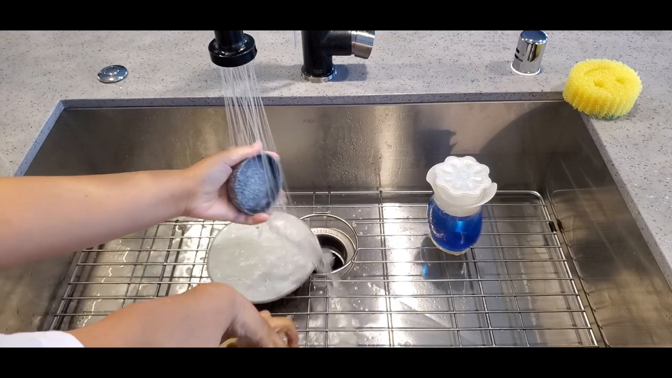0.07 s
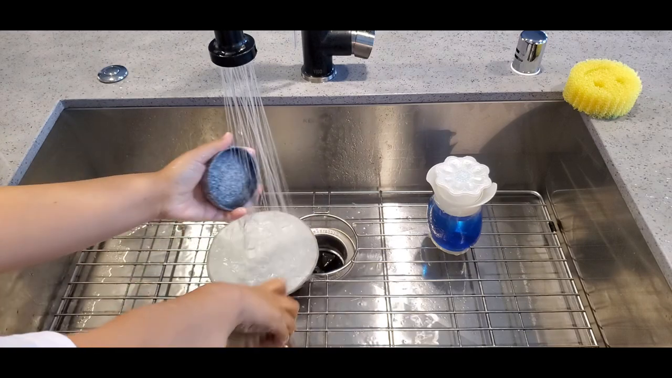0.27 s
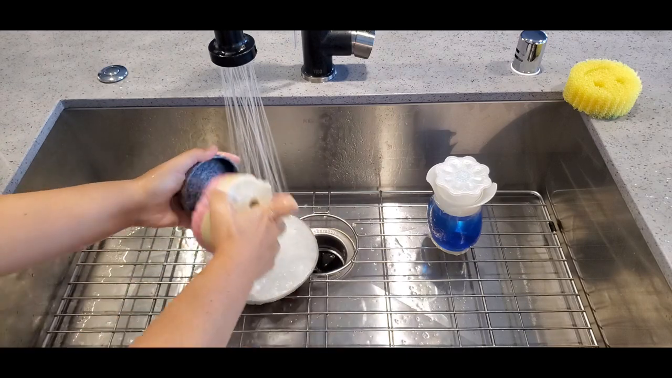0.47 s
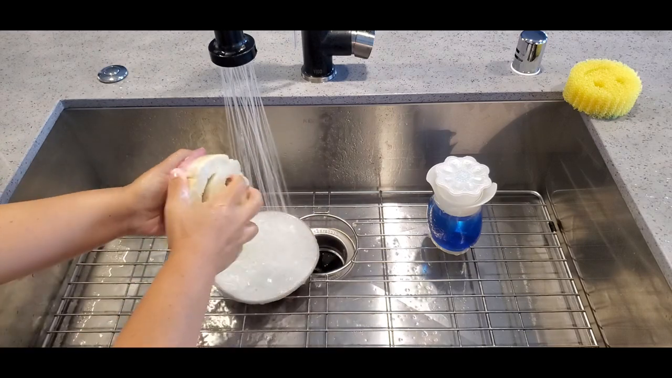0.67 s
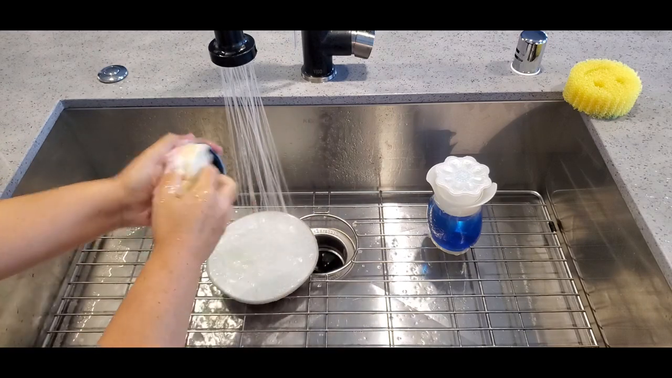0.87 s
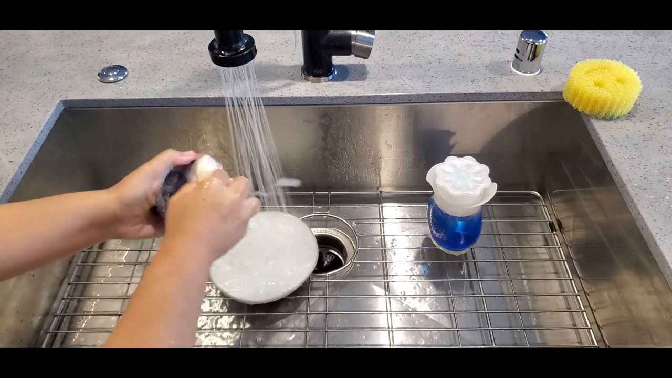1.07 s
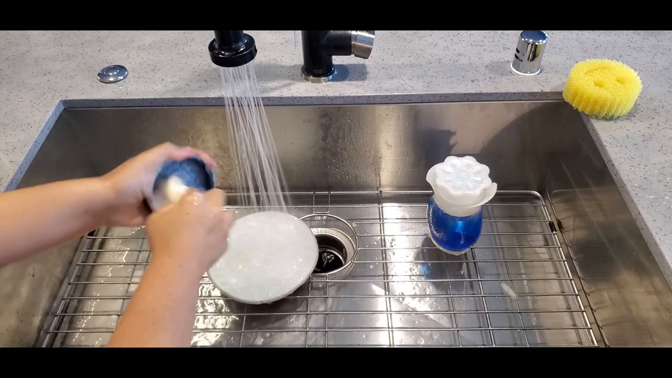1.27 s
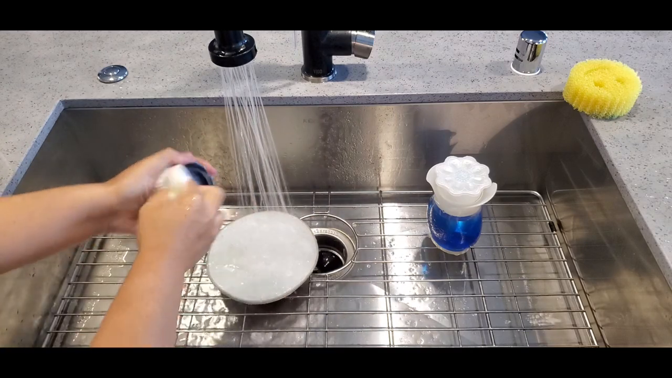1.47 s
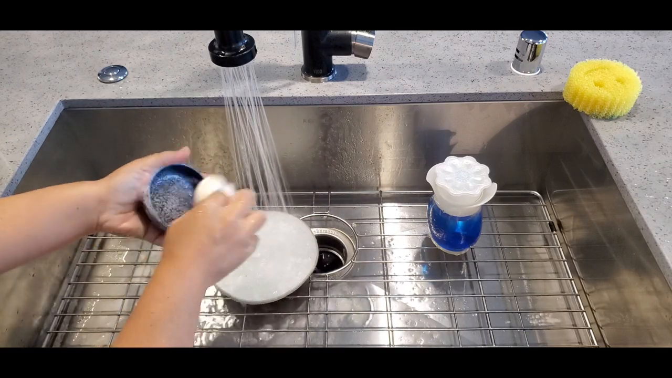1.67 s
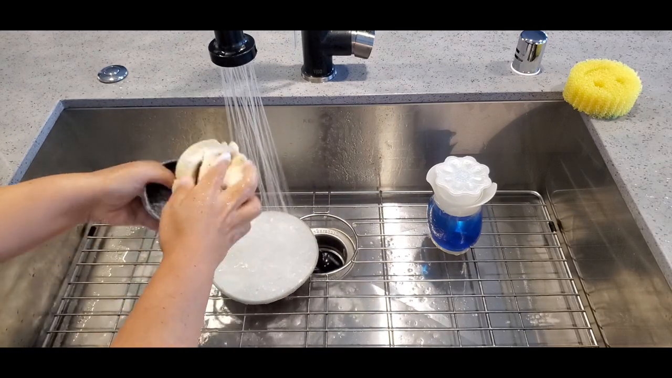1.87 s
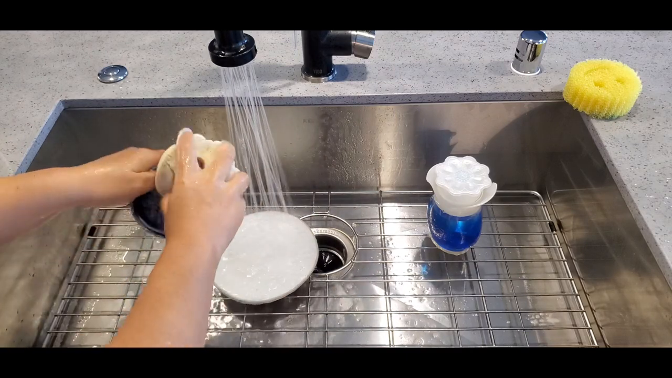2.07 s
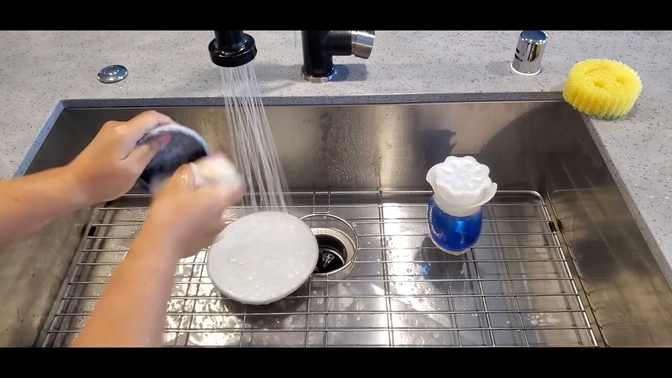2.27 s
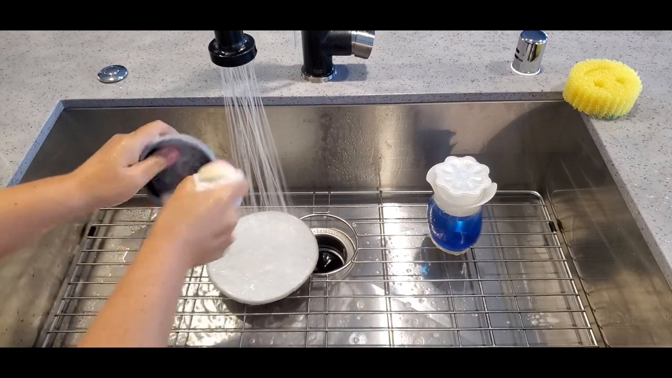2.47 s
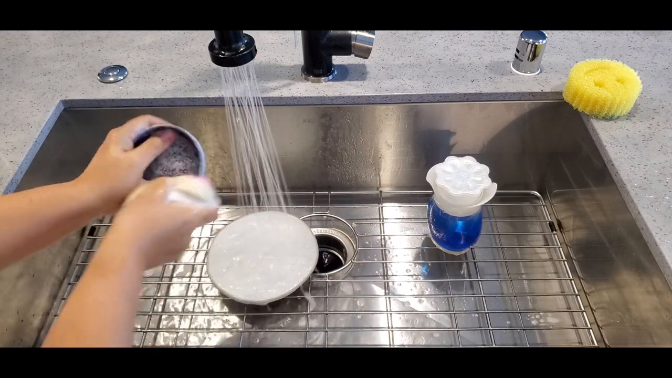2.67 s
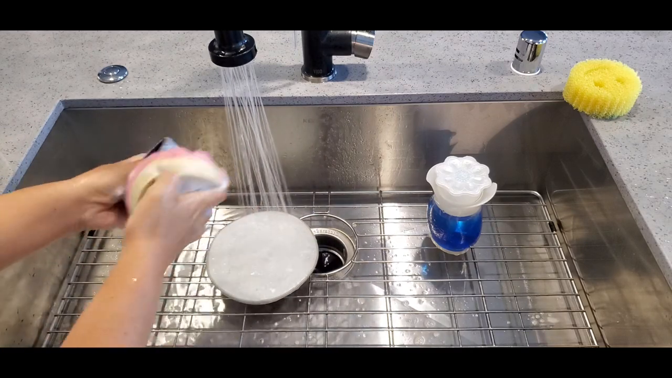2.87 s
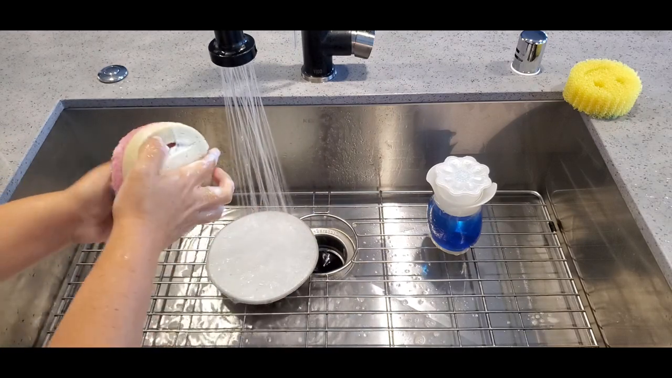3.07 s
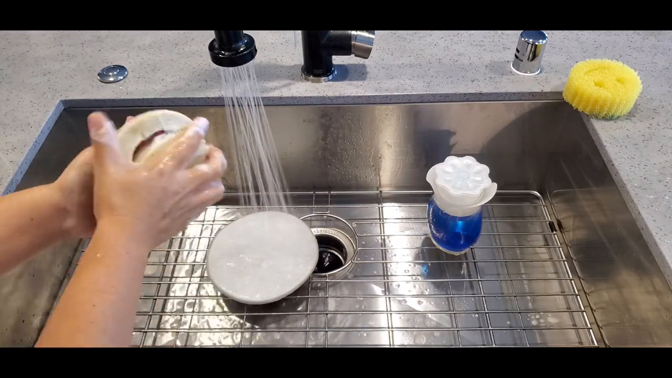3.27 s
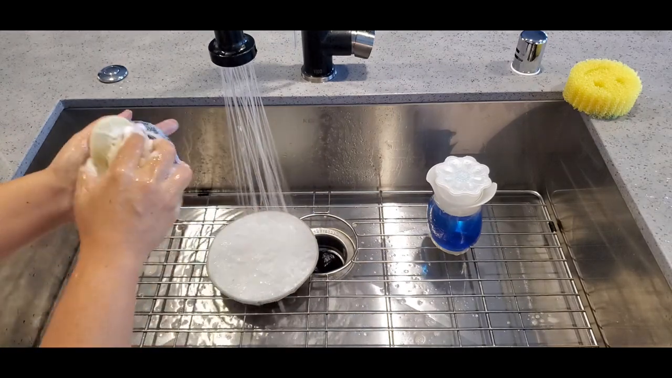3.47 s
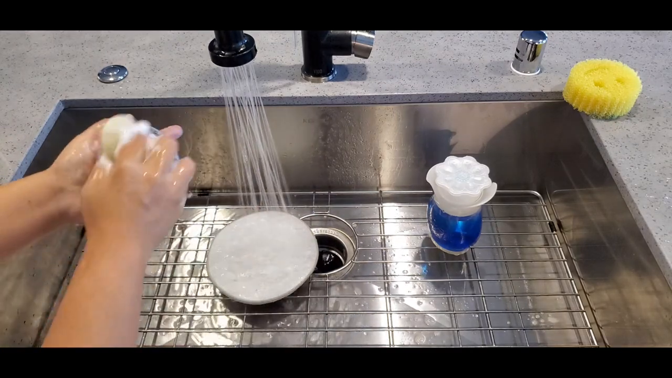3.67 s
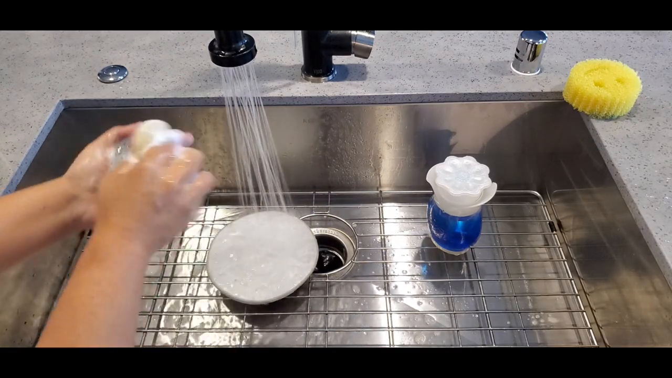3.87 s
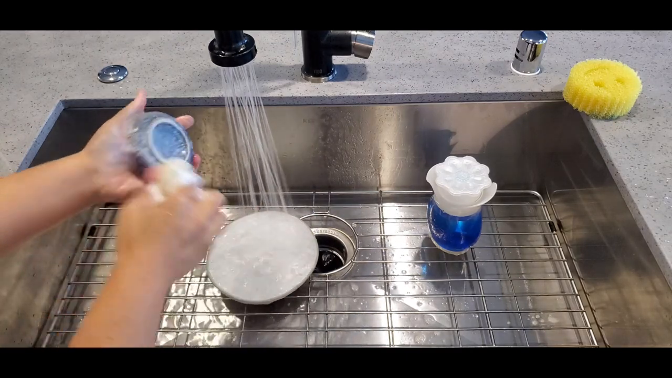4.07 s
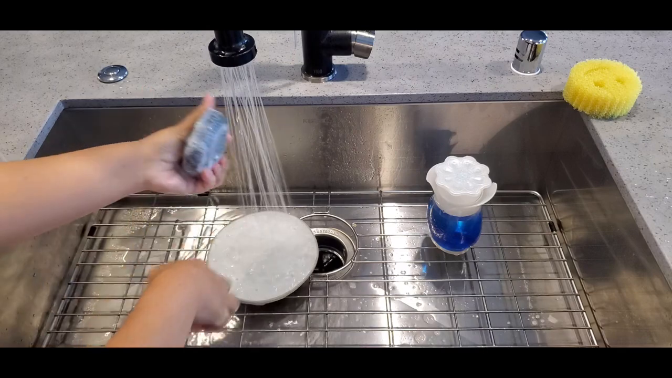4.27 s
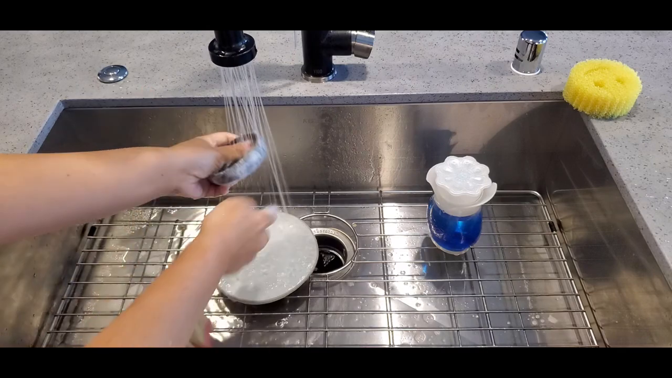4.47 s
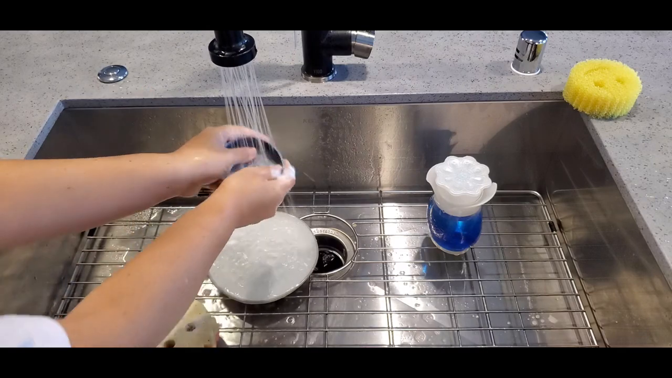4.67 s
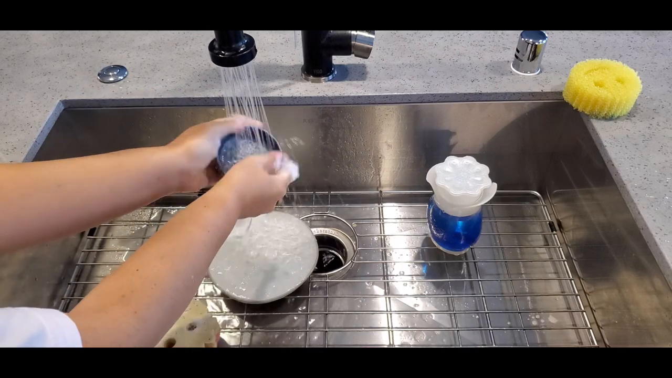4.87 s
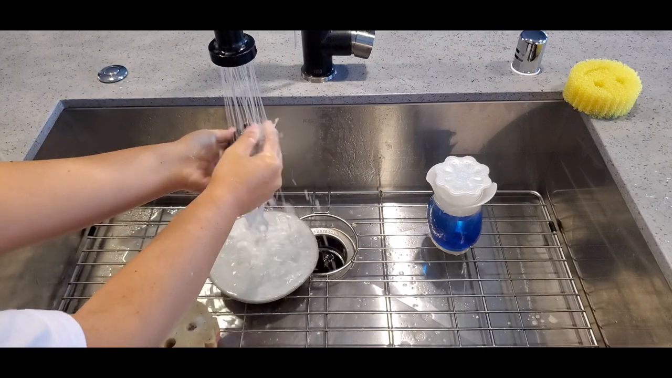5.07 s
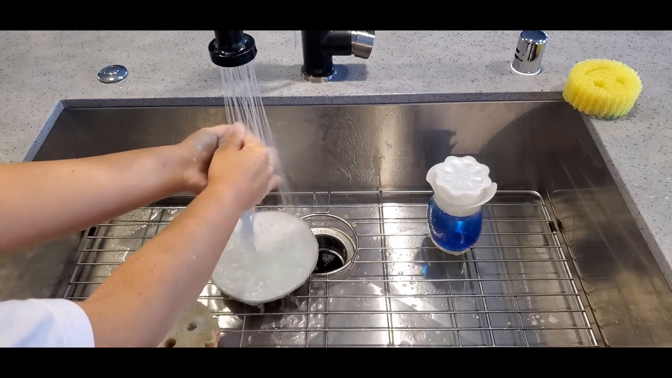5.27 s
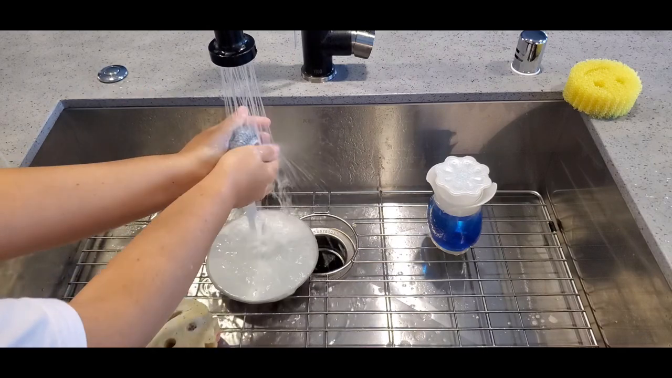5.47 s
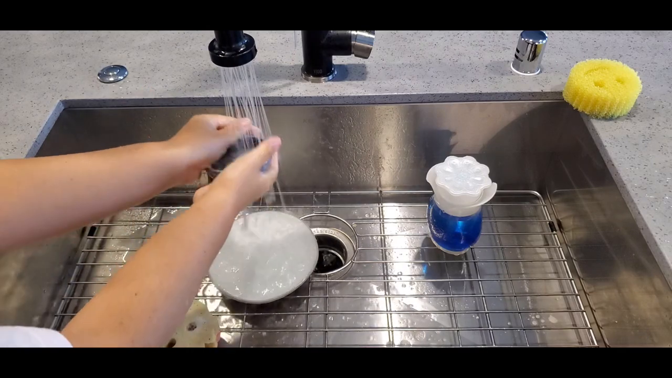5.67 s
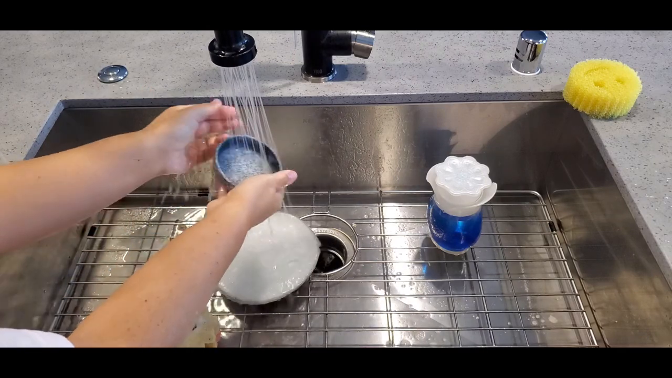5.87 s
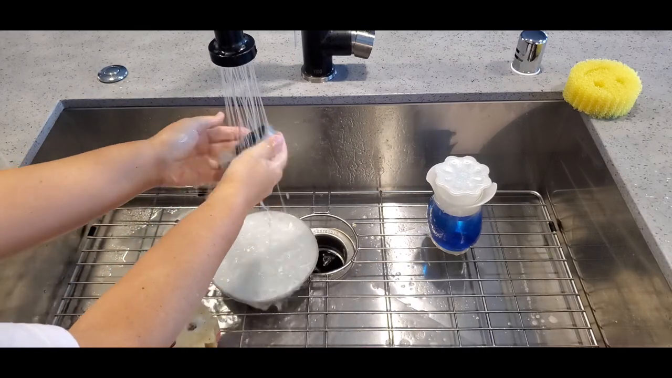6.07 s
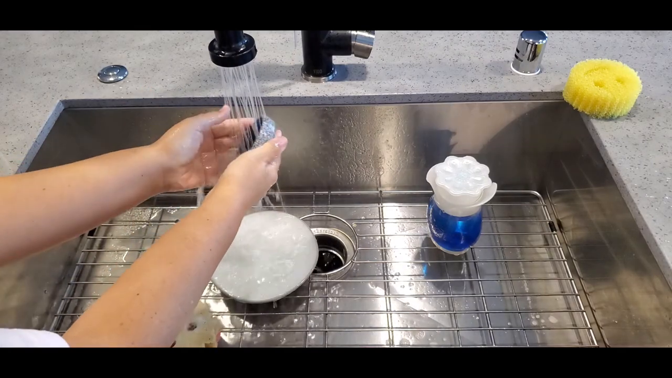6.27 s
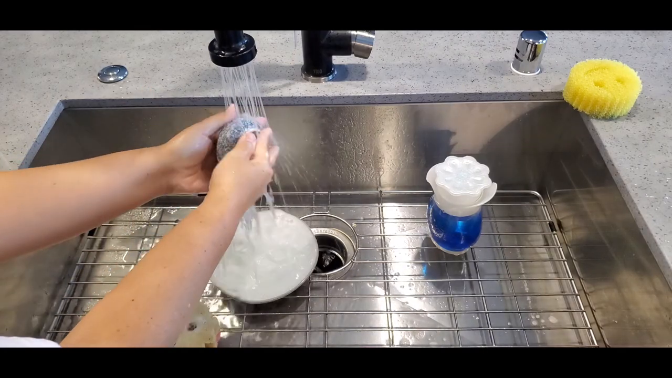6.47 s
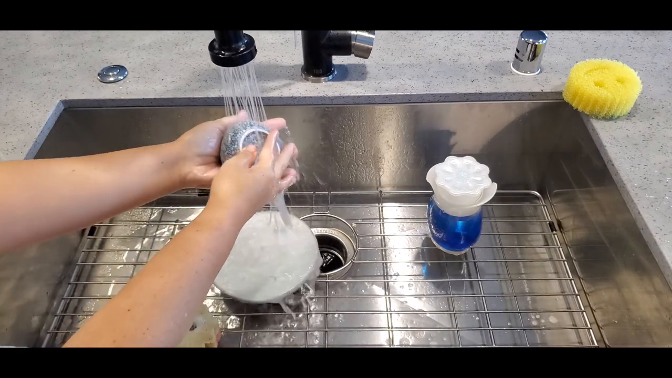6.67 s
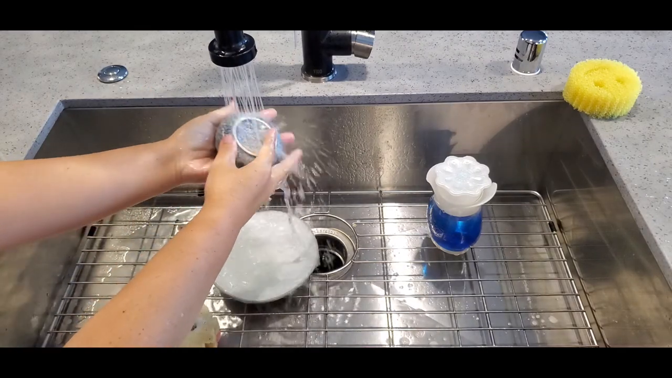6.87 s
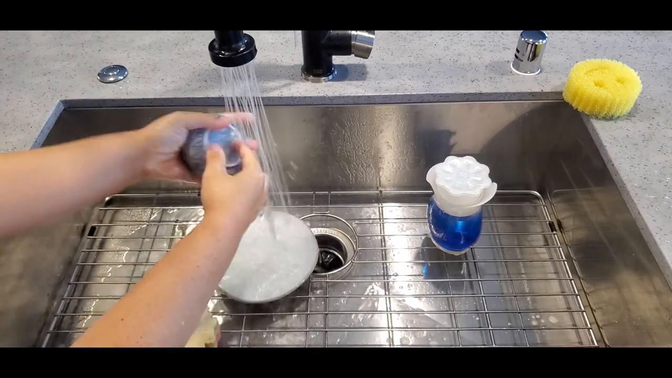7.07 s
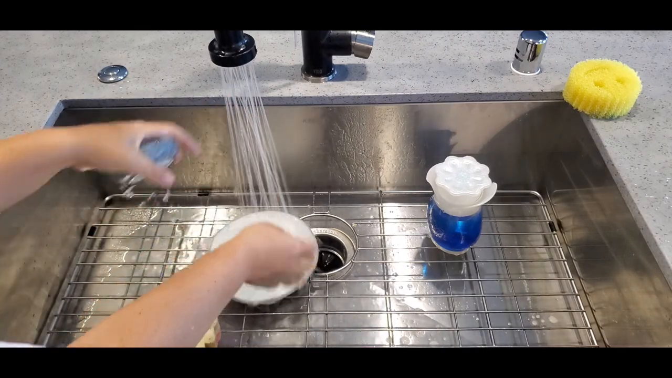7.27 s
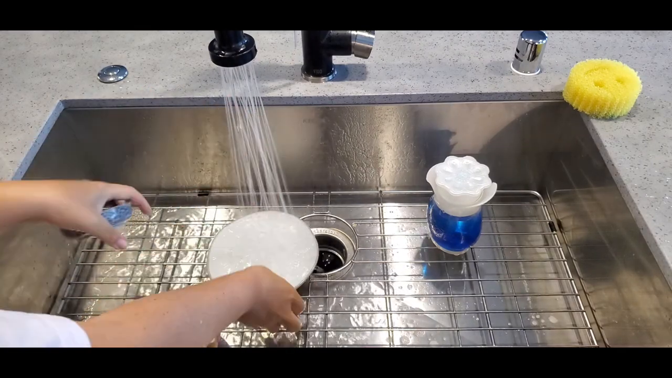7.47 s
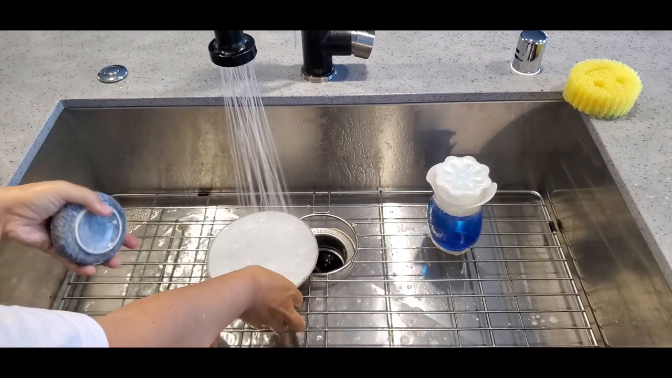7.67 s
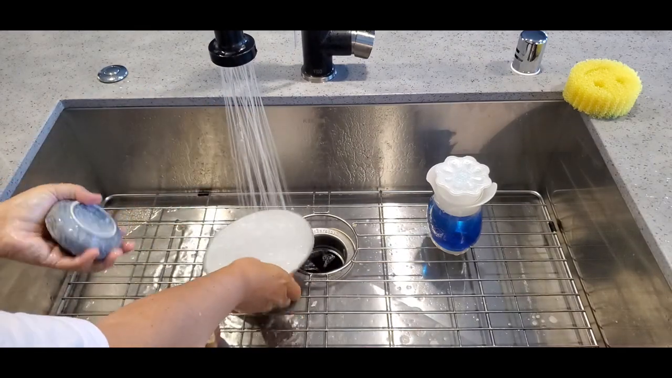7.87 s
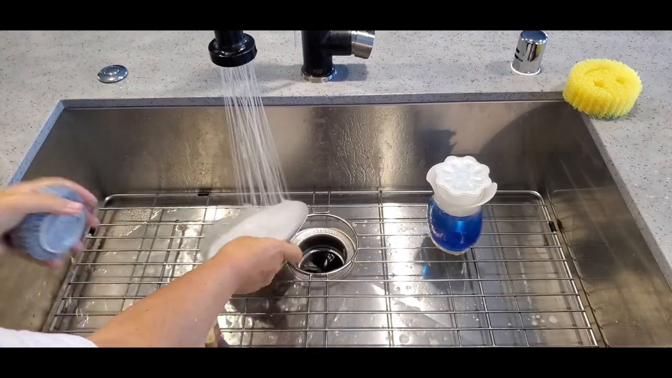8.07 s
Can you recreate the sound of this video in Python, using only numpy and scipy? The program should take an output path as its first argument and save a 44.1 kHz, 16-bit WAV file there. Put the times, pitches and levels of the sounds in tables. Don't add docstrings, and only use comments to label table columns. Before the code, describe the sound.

A faucet sprays steadily onto a plate in a steel sink, bright hiss over ringing bubbles. After a brief splashy start with a small bowl clink, the flow runs full while a bowl is scrubbed nearby with faint damp knocks. Hands then block the jets, leaving spatter, ticks and drips, before the full spray returns with low basin thumps. Close stereo microphones, quiet kitchen hum.

```python
import sys
import numpy as np
from scipy import signal
from scipy.fft import rfft, irfft, next_fast_len
from scipy.io import wavfile
from scipy.ndimage import uniform_filter1d

SR = 44100
rng = np.random.default_rng(int(sys.argv[2]) if len(sys.argv) > 2 else 0)


def dump_mix(stems):
    frames = np.atleast_2d(stems).T
    limited = np.clip(frames, -1, 1)
    pcm = np.round(limited * 32767).astype(np.int16)
    wavfile.write(sys.argv[1], SR, pcm)


def level_to_linear(level):
    exponent = np.asarray(level, float) / 20
    return 10 ** exponent


N = 358091
SIZE = next_fast_len(N, True)
HZ = np.fft.rfftfreq(SIZE, 1 / SR) + 1e-3
STEP = 64


def rms_one(x):
    return x / np.sqrt(np.mean(x ** 2) + 1e-20)


def filtered(spectrum):
    return irfft(spectrum, SIZE)[..., :N]


def band_db(x, low_hz, high_hz):
    part = rfft(x.mean(axis=0), SIZE)[(HZ > low_hz) & (HZ < high_hz)]
    return 10 * np.log10(2 * np.sum(np.abs(part) ** 2) / N / SIZE)


def at_hz(points, hz):
    table_hz, values = np.transpose(points)
    return np.interp(np.log(hz), np.log(table_hz + 1e-3), values)


def in_time(rows):
    s, *columns = np.transpose(rows)
    return [np.interp(np.arange(N) / SR, s, column) for column in columns]


def per_sample(control):
    return np.interp(np.arange(N) / STEP, np.arange(len(control)), control)


def swell(peak_s, length_s, rise_share):
    t = np.arange(0, N, STEP) / SR - peak_s
    rise_s = rise_share * length_s
    fall_s = length_s - rise_s
    return np.clip(1 + np.minimum(t / rise_s, -t / fall_s), 0, 1) ** 1.6


def drift(rate_hz):
    r = np.exp(-80 * np.pi * rate_hz / SR)
    noise = rng.standard_normal(N // 40 + 2002)
    slow = signal.lfilter([1], [1, -2 * r, r * r], noise)[2000:]
    return np.interp(np.arange(N) / 40, np.arange(len(slow)), rms_one(slow))


def ring(clicks, hz, t60_s):
    r = level_to_linear(-60 / (t60_s * SR))
    w = 2 * np.pi * hz / SR
    return signal.lfilter([0, np.sin(w)], [1, -2 * r * np.cos(w), r * r], clicks + 1e-18)


def grains(per_s, spread_db):
    sizes = level_to_linear(spread_db * np.minimum(rng.exponential(1, (2, N)), 5))
    signs = rng.choice([-1, 1], (2, N))
    return sizes * signs * (rng.random((2, N)) < per_s / SR)


def ringing(pitches_hz, per_s, spread_db, cycles, clump_db, clumps_per_s):
    clicks = grains(per_s, spread_db)
    dealt = rng.integers(0, len(pitches_hz), (2, N))
    out = 0
    for k, hz in enumerate(pitches_hz):
        clumped = clicks * (dealt == k) * level_to_linear(clump_db * drift(clumps_per_s))
        out = out + hz * ring(clumped, hz, cycles / hz)
    return rms_one(out)


# f/Hz, correlation
LIKENESS = [(60, .985), (140, .96), (210, .9), (330, .54), (500, -.08), (770, -.35), (1170, .3),
            (1790, .33), (2740, .3), (4190, .32), (9000, .3), (15000, .3)]
# f/Hz, level/dB
LEAN = [(60, 1.5), (110, 0), (200, 0), (380, 1.5), (700, 1.0), (1290, 0.5), (2380, 1), (4400, 6), (8120, 4),
        (15000, 4.5)]


def ports(pair, colour_db):
    mid, side = rfft(pair, SIZE) * level_to_linear(colour_db)
    alike = np.clip(at_hz(LIKENESS, HZ), -.99, .99)
    lean = level_to_linear(at_hz(LEAN, HZ) / 2)
    shared, opposed = np.sqrt(1 + alike) * mid, np.sqrt(1 - alike) * side
    left_lag_s = -.000022
    left = (shared + opposed) * lean * np.exp(-2j * np.pi * HZ * left_lag_s)
    right = (shared - opposed) / lean
    return filtered([left, right])


def patchy(x, count, zones_hz, curves_db, shared_db, own_db):
    spectrum = rfft(x, SIZE)
    together = drift(34.0) + 0.43 * drift(43.0)
    gains_db = np.array([uniform_filter1d(curve, size=400) - band_db(x, *zone)
                         for curve, zone in zip(curves_db, zones_hz)])
    centres_hz = np.geomspace(zones_hz[0][0], zones_hz[-1][1], count)
    middles = np.log(zones_hz).mean(axis=1)
    out = 0
    for hz, hat in zip(centres_hz, np.eye(count)):
        shares = [np.interp(np.log(hz), middles, one) for one in np.eye(len(middles))]
        level_db = shares @ gains_db + shared_db * together + own_db * drift(11.2)
        band = filtered(spectrum * np.interp(np.log(HZ), np.log(centres_hz), hat))
        out = out + level_to_linear(level_db) * band
    return out


def plop(db, hz, t60_s, rise, crack):
    t = np.arange(6000) / SR
    turn = 2 * np.pi * hz * t * (1 + rise * t / t60_s)
    tone = np.sin(turn) * level_to_linear(-60 * t / t60_s) * np.minimum(t * hz, 1)
    noise = np.diff(rng.standard_normal(len(t) + 1)) * level_to_linear(-60 * t / 0.0041)
    return level_to_linear(db) * (tone + crack * noise)


def add(out, s, sound):
    at = round(s * SR)
    out[:, at:at + sound.shape[-1]] += sound[..., :N - at]


# t/s, level/dB re full
REACH = [(0.11, -16), (0.17, -6), (0.7, -1.5), (0.8, -0.5), (4.33, 0.5), (4.52, -6.5), (5.02, -14.5),
         (5.45, -19), (5.65, -20.5), (5.85, -6.5), (6.3, -12), (6.43, -15), (6.68, -20), (6.88, -9),
         (7.0, -10.5), (7.43, -1), (7.9, -0.6), (8.12, -9)]
# t/s, level/dB re full
PLUNGE = [(0.39, -13), (0.58, -4), (0.9, -0.5), (1.2, 2), (2.4, 2.1), (4.4, 3.5), (4.45, -4), (4.62, -15),
          (6.0, -12.5), (6.1, -7), (6.25, -4.5), (6.42, -8), (6.95, -15.5), (7.22, -7), (7.46, -8),
          (7.57, 1), (7.75, -1.5), (8.02, -12)]
# deepest t/s, length/s, level/dB
SHADOWS = [(0.005, 0.1, -5.5), (0.09, .05, -1), (0.44, .14, 0), (4.753, 0.19, -4), (5.348, 0.098, -2),
           (5.503, 0.076, -2), (5.62, 0.1, -1), (5.994, 0.19, -4), (6.427, 0.11, -5.5), (6.657, 0.061, 1.5),
           (6.974, 0.29, -4.5), (5.06, 0.18, -4), (6.376, .06, -1), (6.86, 0.07, -1), (7.033, 0.051, -3),
           (5.762, .05, -6)]
# peak t/s, length/s, level/dB, centre f/Hz
SPILLS = [(0.05, 0.05, -42.5, 4280), (0.125, 0.029, -41.5, 6050), (0.167, 0.07, -41, 5500),
          (0.25, 0.17, -43, 5500), (0.38, 0.25, -39.5, 2700), (0.51, 0.12, -36, 2700),
          (0.73, 0.092, -42, 1900), (4.65, .12, -43, 9000), (4.84, 0.21, -49, 6740),
          (4.88, 0.19, -43.5, 1860), (5.054, 0.13, -52, 1400), (5.247, 0.15, -40, 9800),
          (5.285, 0.27, -42, 3730), (5.5, 0.065, -41.5, 3220), (5.89, 0.18, -46, 2700),
          (5.9, 0.24, -48, 9000), (6.15, 0.14, -45, 5900), (6.463, 0.1, -41.5, 3700),
          (6.56, .09, -49, 5200), (6.72, 0.11, -43, 3500), (6.832, 0.17, -59, 1400), (7.09, .09, -45, 3480),
          (7.27, 0.21, -40, 3580), (7.342, 0.12, -45, 1600), (8.11, 0.084, -48, 1300)]
# peak t/s, length/s, level/dB
MISTS = [(0.049, .09, -38), (0.125, .06, -34), (0.16, 0.055, -31), (0.3, 0.24, -34), (4.64, 0.14, -34),
         (4.94, 0.36, -36), (5.144, 0.29, -37.5), (5.44, 0.087, -49), (5.57, .08, -58), (5.7, .1, -46),
         (5.89, 0.62, -34.5), (6.09, 0.15, -37), (6.36, .1, -41), (6.52, .1, -50), (6.89, .1, -46)]
# centre f/Hz, full flow level/dB, reach share, plunge share, trickle level/dB
PARTS = [(1450, -40.5, 0.074, 1, -57.5), (2700, -39.5, 0.73, 0.36, -55.5),
         (4900, -41.5, 0.69, 0.091, -57.5), (6600, -40.5, 0.77, 0.03, -74), (9600, -37, 0.84, 0.01, -83),
         (13200, -35.5, 0.77, 0.012, -48)]


def flow():
    mist_hz, spill_octaves = 17000, 0.39
    reach_db, plunge_db = in_time(REACH)[0][::STEP], in_time(PLUNGE)[0][::STEP]
    shade_db = sum(db * swell(s, length_s, 0.65) for s, length_s, db in SHADOWS)
    thrown = SPILLS + [(*mist, mist_hz) for mist in MISTS]
    _, _, spill_db, spill_hz = np.transpose(thrown)
    spills = np.array([swell(s, length_s, 0.53) for s, length_s, _, _ in thrown])
    levels_db = []
    for hz, full_db, by_reach, by_plunge, trickle_db in PARTS:
        near = level_to_linear(2 * spill_db) * np.exp(-(np.log2(spill_hz / hz) / spill_octaves) ** 2)
        jets_db = full_db + by_reach * reach_db + by_plunge * plunge_db
        steady = level_to_linear(2 * jets_db) + level_to_linear(2 * trickle_db)
        power = steady * level_to_linear(2 * shade_db) + near @ spills
        levels_db.append(per_sample(10 * np.log10(power)))
    return levels_db


# f/Hz, level/dB per Hz
BUBBLE_COLOUR = [(600, -24), (900, -11.5), (1150, -16), (1320, 1.5), (1900, -1.5), (2700, -0.5),
                 (3800, -13), (4600, -21), (9000, -45)]
# f/Hz, width/Hz, level/dB
BASIN = [(1115, 126, 14), (1337, 17, 8.5), (1477, 71, 6), (1580, 33, 6), (1700, 40, 5), (1808, 24, 8),
         (1870, 33, 9), (2023, 55, 7), (2169, 35, 3.5), (2240, 30, 7), (2618, 37, 4), (3070, 100, 5.5),
         (3630, 34, -6), (4000, 40, 7)]


def bubbles(levels_db):
    rings = ringing(np.geomspace(1000, 4500, 26), per_s=4000.0, spread_db=1.5, cycles=36.0,
                    clump_db=2.0, clumps_per_s=14.7)
    basin_db = sum(db / (1 + (2 * (HZ - hz) / width_hz) ** 2) for hz, width_hz, db in BASIN)
    water = ports(rings, basin_db + at_hz(BUBBLE_COLOUR, HZ))
    zones_hz = [(1100, 2340), (2000, 4300)]
    return patchy(water, 6, zones_hz, levels_db, shared_db=-0.02, own_db=0.75)


# f/Hz, level/dB per Hz
SPRAY_COLOUR = [(2000, -15), (3500, -4.5), (6200, -4), (7600, -2), (8100, -8), (8630, -9), (10500, -7.5),
                (12000, 0), (14500, 4), (16500, 6)]


def spray(levels_db):
    fizz = ringing(np.geomspace(3000, 17000, 12), per_s=8000.0, spread_db=3.5, cycles=19.0,
                   clump_db=1.0, clumps_per_s=39.0)
    cracks = rms_one(grains(per_s=9000.0, spread_db=3.0))
    blur = rng.standard_normal((2, N))
    hiss = ports(0.57 * fizz + 0.43 * cracks + 0.7 * blur, at_hz(SPRAY_COLOUR, HZ))
    zones_hz = [(3800, 5800), (5800, 8000), (8000, 11500), (11500, 15700)]
    return patchy(hiss, 8, zones_hz, levels_db, shared_db=0.53, own_db=1.02)


# f/Hz, level/dB per Hz
HUM = [(15, -43), (25, -18), (69, -9), (107, -4.5), (183, -3), (210, -3.5), (273, -1.5), (305, -3),
       (428, -4), (610, -5.5), (659, -1.5), (955, -8), (1000, -7.5), (1300, -8.5), (2200, -120)]
# (peak t/s, length/s, level/dB)
BOOMS = [
    (40, 76, [(4.57, .5, 7), (7.85, .6, 7), (8.12, 0.46, 16)]),
    (96, 43, [(0.05, 1, 10.5), (4.72, 0.36, -3), (6.58, 0.51, 8), (7.45, 1, 5), (8.08, .3, 6)]),
    (230, 140, [(7.56, 1, 4.5), (8.08, .3, 8)]),
]


def kitchen():
    basin_db = 6 / (1 + ((HZ - 96) / 8) ** 2) + 5 / (1 + ((HZ - 254) / 11) ** 2)
    hum = ports(rng.standard_normal((2, N)), at_hz(HUM, HZ) + basin_db)
    hum_db = -50.5
    calm = hum * level_to_linear(hum_db - band_db(hum, 25, 720))
    out = calm
    for hz, width_hz, leans in BOOMS:
        swell_db = sum(db * swell(s, length_s, 0.53) for s, length_s, db in leans)
        mode = filtered(rfft(calm, SIZE) / (1 + (2 * (HZ - hz) / width_hz) ** 4))
        out = out + mode * per_sample(level_to_linear(swell_db) - 1)
    return out


# f/Hz, level/dB, t60/s
CLINK = [(1080, -23, 0.056), (1127, -38, 0.21)]


def clink():
    out = np.zeros((2, N))
    rings = sum(plop(db, hz, t60_s, rise=0, crack=0) for hz, db, t60_s in CLINK)
    push = np.minimum(np.arange(len(rings)) / SR / 0.0063, 1)
    add(out, 0.038, rings * push * level_to_linear([[-3], [3]]))
    return out


# t/s, level/dB
HARD_SPITS = [(0.1143, -26), (0.1637, -20), (0.2435, -20), (0.2839, -20), (0.3228, -23), (0.3438, -21),
              (0.4151, -24),
              (0.0534, -25), (5.1243, -24), (5.4355, -31), (5.5428, -32), (5.5566, -22), (5.5864, -30),
         (5.6376, -33), (5.6945, -32), (5.7788, -26), (5.7964, -26), (7.0638, -25), (7.8745, -11),
         (7.9573, -17),
              (5.8418, -25), (5.9092, -24), (6.0434, -18), (6.1427, -28), (6.231, -37), (6.3667, -25),
              (6.4814, -30), (6.7987, -33), (6.888, -28), (6.9244, -28)]


def spits():
    out, t = np.zeros((2, N)), np.arange(300) / SR
    bright = signal.butter(3, 12500, "high", fs=SR, output="sos")
    envelope = np.minimum(t / .0008, 1) * level_to_linear(-60 * t / .0035)
    for s, db in HARD_SPITS:
        shared, own = rng.standard_normal((2, len(t))) * envelope
        burst = signal.sosfilt(bright, [shared + 0.35 * own, shared - 0.28 * own])
        add(out, s, level_to_linear(db + 4.5) * burst / np.abs(burst).max())
    return out * level_to_linear([[2.2], [-2.2]])


# t/s, level/dB, f/Hz
TICKS = [(5.291, -35, 7600), (7.0419, -26, 9600), (7.0878, -35, 7060), (7.818, -23, 7700),
         (0.0557, -34, 4740), (4.8085, -36, 4260), (5.1873, -43, 5190), (5.197, -34, 5100),
         (5.237, -34, 4200), (5.4452, -39, 5170), (5.465, -36, 4550), (5.5782, -38, 4610),
         (5.6357, -44, 4180), (5.7714, -38, 10600), (6.4524, -39, 2950), (6.5422, -40, 3460),
         (6.555, -34.5, 3660), (6.5894, -38, 3730), (6.6263, -37, 4540), (6.6694, -38, 3420),
         (6.7372, -40, 2950), (5.247, -31, 9700), (6.7575, -40, 3380), (6.8024, -34, 6000),
         (6.877, -42, 3200), (6.931, -42, 3900), (6.9571, -39, 4050), (7.016, -41, 3700),
         (7.0354, -36, 6350), (7.037, -37, 3700), (7.1038, -29, 3970), (4.7287, -35, 1790),
         (4.7284, -38, 2500), (7.24, -34, 4200), (7.255, -36, 4600), (7.461, -33, 3100)]


def ticks():
    out, t = np.zeros((2, N)), np.arange(600) / SR
    for s, db, hz in TICKS:
        shared, own = rng.standard_normal((2, len(t)))
        band = signal.butter(1, [hz / 1.06, hz * 1.06], "band", fs=SR, output="sos")
        pair = np.array([shared + 0.24 * own, shared - 0.78 * own])
        burst = signal.sosfilt(band, pair * level_to_linear(-60 * t / 0.015))
        add(out, s, level_to_linear(db + 5.5) * burst / np.abs(burst).max())
    return out * level_to_linear([[1.8], [-1.8]])


# t/s, level/dB, f/Hz, left-right/dB
DRIPS = [(0.1595, -27, 2550, -5), (0.2503, -39, 3010, 13), (0.7077, -23, 1870, 3), (5.16, -37, 1140, 13),
         (5.4909, -26, 2220, 7), (5.661, -34, 2470, 0.5), (5.7124, -32, 1520, 3), (5.8301, -32, 2000, 2.5),
         (5.877, -33, 2630, 4.0), (6.085, -29, 1370, 4), (6.1094, -39, 1710, 2.5), (6.4258, -32, 2500, 0.0),
         (6.454, -32, 1890, 1.0), (6.5824, -33, 1520, 8), (6.616, -32, 2210, 5), (6.697, -31, 2940, 0.0),
         (6.696, -31, 1520, 3), (6.735, -32, 1340, 3), (6.793, -31, 1390, 3), (6.494, -34, 2500, 3),
         (7.158, -32, 1960, 3), (7.177, -30, 1420, 3), (7.0653, -27, 1340, 6), (7.1916, -29, 2820, 2.5),
         (7.264, -22.5, 1540, 4), (7.561, -21.5, 1350, -0.5), (7.7787, -26, 1580, 2.0),
         (7.808, -25.5, 1310, 7)]


def drips():
    out = np.zeros((2, N))
    for s, db, hz, pan_db in DRIPS:
        drop = plop(db - 5.5, hz, 0.036, rise=0.011, crack=.35)
        add(out, s, drop * level_to_linear([[pan_db / 2], [-pan_db / 2]]))
    return out


# t/s, level/dB, f/Hz
GURGLES = [(0.8587, -48, 2020), (1.0772, -30, 1815), (1.4275, -33, 1500), (1.596, -32, 1480),
           (1.7194, -31, 1506), (2.3005, -33, 1880), (2.472, -30, 1340), (2.491, -27.5, 1340),
           (2.507, -32, 1337), (7.32, -36, 1720), (7.3494, -39, 2170)]
# t/s, level/dB, f/Hz
POPS = [(0.6382, -29, 1500), (0.7073, -20, 1840), (0.7914, -24, 2170), (0.8777, -30, 1340),
        (0.9416, -26, 1750), (1.0432, -23, 1570), (1.1052, -21.5, 1900), (1.187, -26, 1370),
        (1.2598, -38, 1460), (1.4015, -26, 1840), (1.465, -20, 1530), (1.5292, -25, 1325),
        (1.5856, -23, 1460), (1.7737, -19, 1970), (1.8799, -30, 1630), (1.9244, -21, 1400),
        (2.311, -21, 1780), (2.3703, -22, 1380), (2.4621, -29, 1324), (2.5424, -21, 2010),
        (2.5833, -23, 1970), (2.6457, -19, 2000), (2.6891, -22, 2740), (2.8507, -23, 3070),
        (2.8941, -25, 2580), (2.9734, -25, 1555), (3.0802, -25, 1350), (3.152, -21, 1395),
        (3.2084, -22.5, 2610), (3.2568, -23, 1710), (3.3481, -31, 1460), (3.43, -23, 1810),
        (3.5736, -24, 1900), (3.6329, -19.5, 2170), (3.904, -23, 1450), (3.9692, -26, 1790),
        (4.1383, -24, 1820), (4.1847, -21, 2030), (4.2254, -33, 1300), (4.3074, -24, 2680)]


def gurgles():
    out = np.zeros((2, N))
    for s, db, hz in GURGLES:
        add(out, s, plop(db - 2.5, hz, 0.21, rise=0.023, crack=0) * level_to_linear([[.8], [-.8]]))
    for s, db, hz in POPS:
        add(out, s, plop(db - 8.0, hz, 0.064, rise=0.035, crack=0) * level_to_linear([[.7], [-.7]]))
    return out


# t/s, level/dB, f/Hz, t60/s
KNOCKS = [(1.2, -46.5, 480, 0.037), (1.23, -60, 496, 0.045), (1.382, -51, 560, 0.046),
          (1.495, -52, 560, 0.06), (1.507, -48, 700, 0.059), (7.677, -57, 650, 0.056),
          (7.989, -54, 690, 0.16)]
# pitch ratio, level/dB
KNOCK_MODES = [(1, 18), (1.38, -6), (1.85, 17), (2.3, 3)]


def knocks():
    out, t = np.zeros((2, N)), np.arange(6000) / SR
    for s, db, hz, t60_s in KNOCKS:
        for ratio, mode_db in KNOCK_MODES:
            mode = plop(db - 2.0 + mode_db, hz * ratio, 0.24 * t60_s, rise=-0.022, crack=.15)
            add(out, s, mode * np.array([[1], [.6]]))
        body = signal.butter(2, [0.8 * hz, 2.3 * hz], "band", fs=SR, output="sos")
        puff = rms_one(signal.sosfilt(body, rng.standard_normal((2, len(t)))))
        add(out, s, puff * np.minimum(t / 0.0035, 1) * level_to_linear(db + 11 - 60 * t / (2.2 * t60_s)))
    return out


# t/s, level/dB, f/Hz, t60/s
THUMPS = [(4.67, -39.5, 95.6, 0.47), (6.552, -36, 95.4, 0.34), (6.889, -47, 190, 0.71),
          (7.451, -36, 251, 0.39), (7.485, -40, 114, 0.27), (7.504, -40, 263, .35),
          (7.994, -39, 247.5, 0.31), (7.994, -43, 92, .4), (8.084, -46, 238, .25)]


def thumps():
    out, t = np.zeros((2, N)), np.arange(SR // 2) / SR
    push = np.minimum(t / 0.013, 1)
    for s, db, hz, t60_s in THUMPS:
        tone = np.sin(2 * np.pi * hz * t) * push * level_to_linear(db - 60 * t / t60_s)
        add(out, s, tone * level_to_linear([[0.6], [-0.6]]))
    return out


# t/s, air space f/Hz, level/dB
FILLS = [
    [(4.86, 1330, -49), (4.9, 1270, -41.5), (5.02, 1293, -50.5)],
    [(5.15, 1250, -58), (5.178, 1172, -44), (5.205, 1210, -52)],
    [(6.16, 1950, -53), (6.242, 2270, -46), (6.34, 2200, -55)],
    [(7.188, 2800, -42), (7.24, 2880, -46), (7.3, 3100, -46)],
    [(7.25, 1600, -48), (7.3, 1650, -48), (7.375, 1700, -49)],
    [(7.24, 2250, -48), (7.29, 2350, -50), (7.37, 2500, -45)],
]


def bowl():
    out, t = np.zeros(N), np.arange(N) / SR
    for fill in FILLS:
        hz, db = in_time(fill)
        start_s, end_s = fill[0][0], fill[-1][0]
        gate = np.clip(np.minimum(t - start_s, end_s - t) / 0.013, 0, 1)
        turn = 2 * np.pi * np.cumsum(hz) / SR
        rough = drift(230.0) * np.sin(turn) + drift(130.0) * np.cos(turn)
        out += gate * level_to_linear(db + 2.5) * rough
    return out * level_to_linear([[1.2], [-1.2]])


def scene():
    large, small, *droplets = flow()
    water = bubbles([large, small]) + spray(droplets)
    drops = spits() + ticks() + drips() + gurgles()
    contacts = clink() + knocks() + thumps()
    return water + drops + contacts + bowl() + kitchen()


def low_pass(x):
    return signal.sosfilt(signal.butter(12, 15750, fs=SR, output="sos"), x)


def record(dry):
    return low_pass(dry)


dry = scene()
out = record(dry)
dump_mix(out)
```